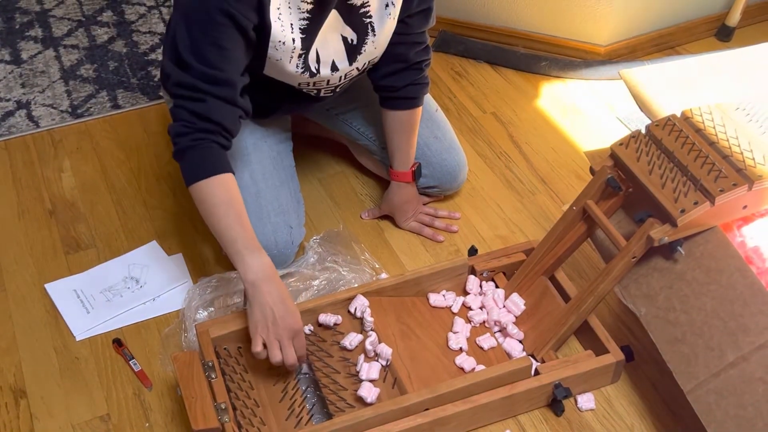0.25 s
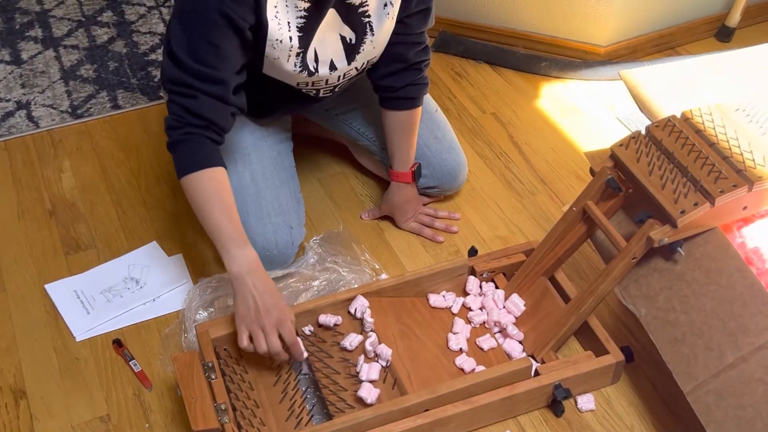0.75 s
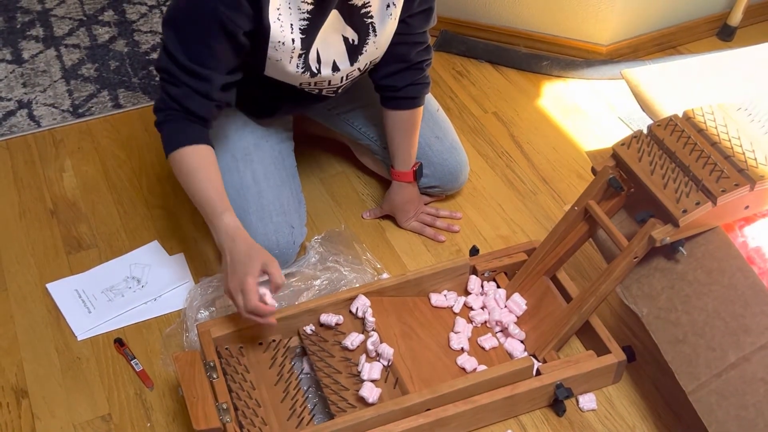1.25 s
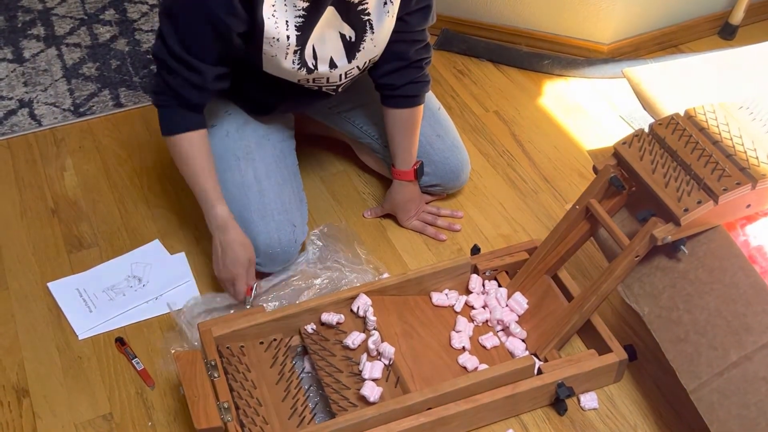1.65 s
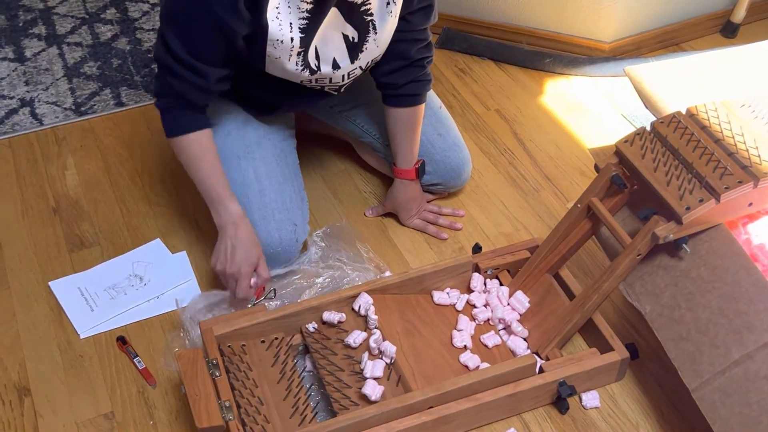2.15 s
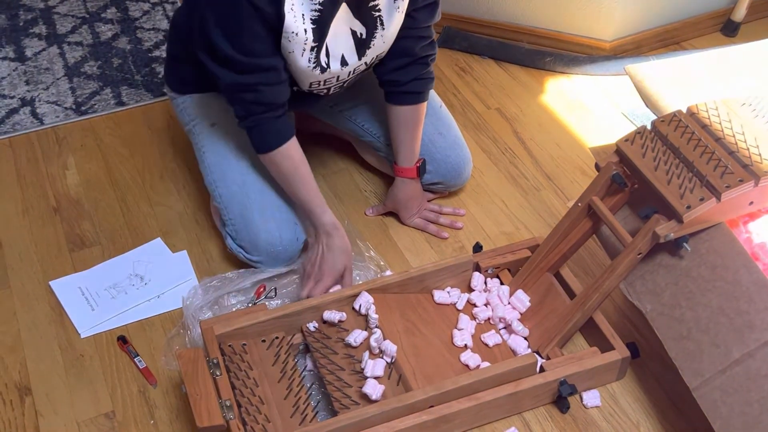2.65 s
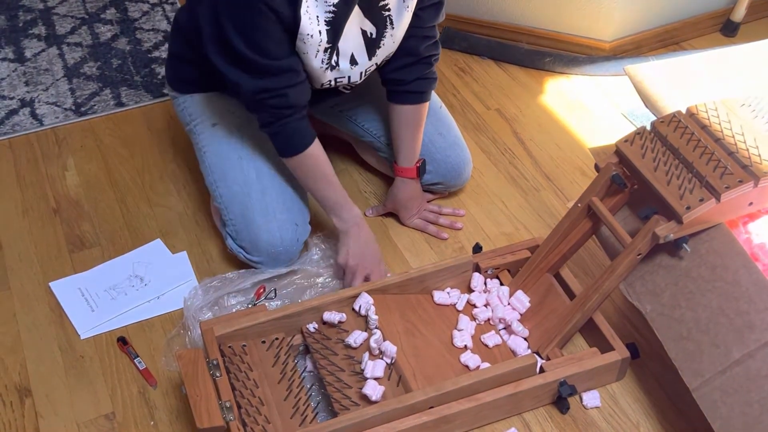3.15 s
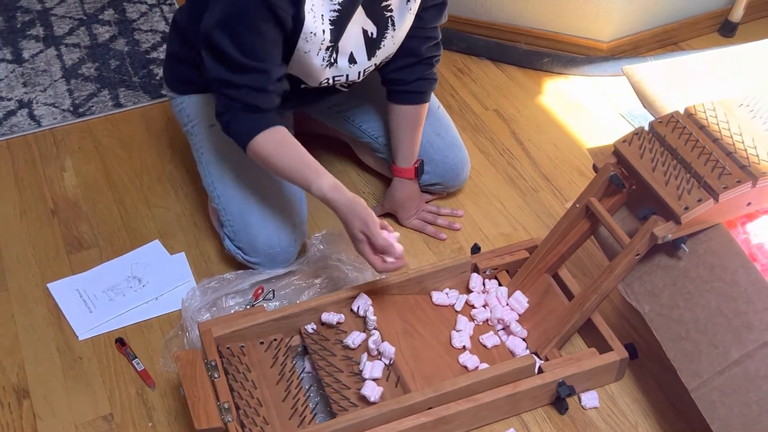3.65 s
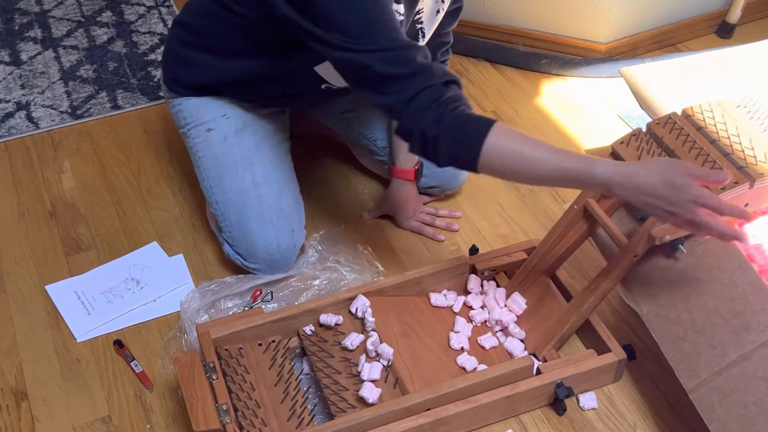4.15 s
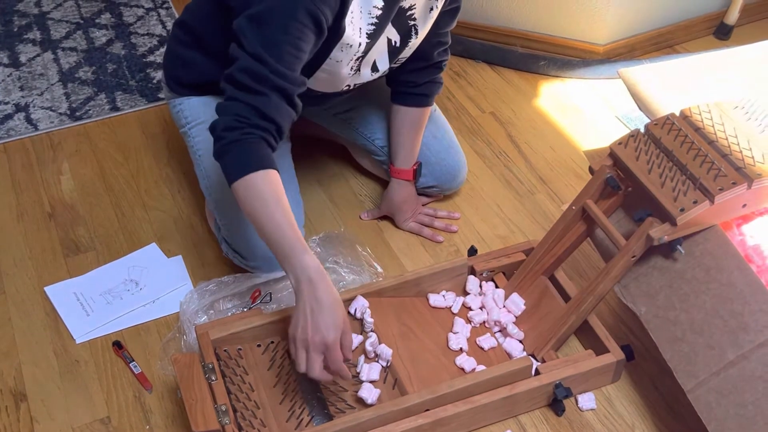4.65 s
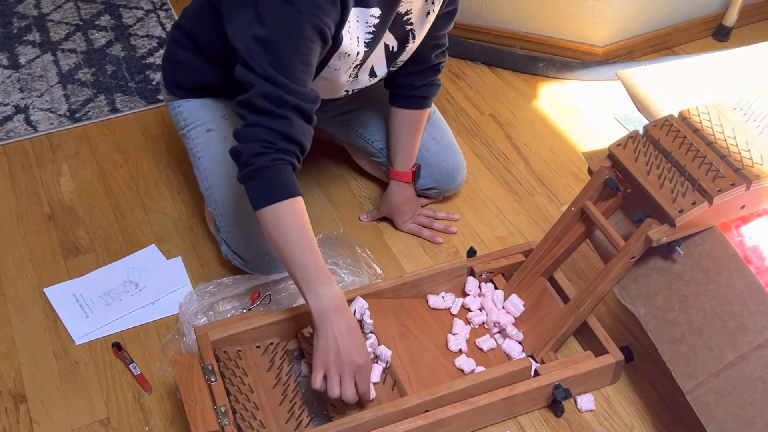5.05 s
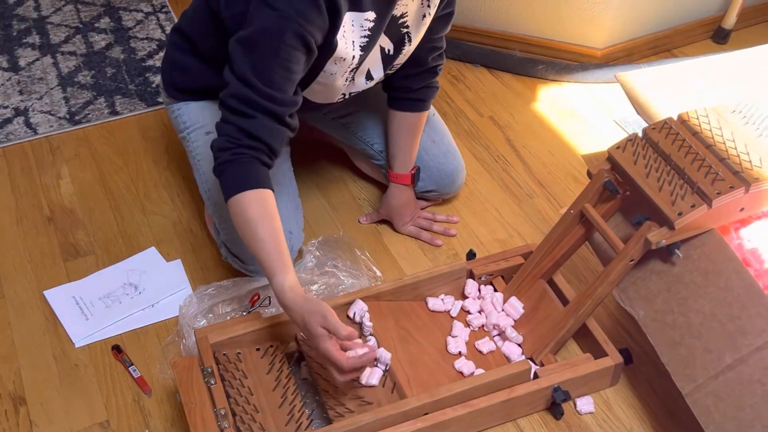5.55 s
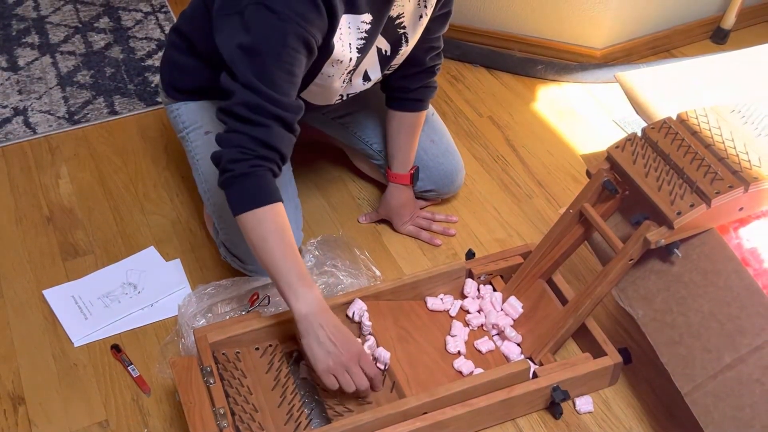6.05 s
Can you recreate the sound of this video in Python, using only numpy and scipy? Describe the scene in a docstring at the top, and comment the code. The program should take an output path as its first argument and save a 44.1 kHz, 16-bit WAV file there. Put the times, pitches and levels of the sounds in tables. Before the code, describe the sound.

Light foam pieces are handled among steel pins in a wooden tray, heard by two close microphones indoors. Short dry rustles and hollow creaks come first, then plastic film crinkling with sharp ticks and a quick rasp. A soft knock on wood precedes the busiest foam rustle and a tiny squeak. Later there are isolated scuffs, one loud crisp snap and delicate pin plucks, with short room reverberation over soft rumble and faint hiss.

```python
"""A live room with a wooden floor: someone kneeling picks foam packing peanuts out of a wooden tray set with steel pins.
The foam rustles, creaks and scuffs as crackles shaped by finger pressure, snaps as noise bursts, squeaks as rough tones.
The hand crinkles a plastic bag, drags one sharp rasp from it, rubs and bumps the wood (ringing modes), plucks the pins.
A diffuse noise tail answers as the room, over a low rumble, a drone and a hiss; two close microphones hear it."""
import sys
import numpy as np
from scipy import signal
from scipy.fft import rfft, irfft, next_fast_len
from scipy.io import wavfile
from scipy.ndimage import map_coordinates

SR = 44100
rng = np.random.default_rng(int(sys.argv[2]) if len(sys.argv) > 2 else 0)


def dump_mix(stems):
    """Bounce the given channels to the path in sys.argv[1] as a 16-bit WAV at rate SR."""
    frames = np.atleast_2d(stems).T  # one column per channel
    limited = np.clip(frames, -1, 1)  # hard clip at full scale
    pcm = np.round(limited * 32767).astype(np.int16)
    wavfile.write(sys.argv[1], SR, pcm)


N = 278271
TIME = np.arange(N) / SR


def amp(db):
    """Decibels to gain."""
    return 10 ** (np.asarray(db) / 20)


def unit(x):
    """Scale to rms 1."""
    return x / np.sqrt(np.mean(x ** 2) + 1e-20)


def along(points, hz):
    """(frequency [Hz], value) points read on a log frequency axis."""
    f, v = np.transpose(points)
    return np.interp(np.log(hz + 1), np.log(f + 1), v)


def wobble(rate):
    """A smooth random curve, rate knots a second."""
    knots = rng.standard_normal(int(N * rate / SR) + 4)
    return map_coordinates(knots, [TIME * rate])


def filtered(x, response):
    """x times a complex response of frequency."""
    size = next_fast_len(N + SR // 2)
    return irfft(rfft(x, size) * response(np.fft.rfftfreq(size, 1 / SR)), size)[..., :N]


def coloured(x, spectrum, size=4096):
    """x through a causal (minimum-phase) filter of energy 1 with this spectrum."""
    cepstrum = irfft(np.log(amp(along(spectrum, np.fft.rfftfreq(size, 1 / SR)))))
    fold = np.r_[1, np.full(size // 2 - 1, 2), 1, np.zeros(size // 2 - 1)]
    kernel = irfft(np.exp(rfft(cepstrum * fold)))
    return signal.fftconvolve(x, kernel / np.linalg.norm(kernel))[:N]


def add(track, s, sound):
    """Mix a sound into a track at time s."""
    part = track[max(round(s * SR), 0):][:len(sound)]
    part += sound[:len(part)]


def crackle(rate, spread_db):
    """Tiny slips at random moments, rate a second, of uneven size and either sign, rms 1."""
    sizes = amp(spread_db * np.clip(rng.standard_normal(N), -2, 2))
    slips = rng.random(N) < rate / SR
    return unit(slips * sizes * rng.choice([-1, 1], N))


def burst(t60):
    """Noise that starts at about 1 and dies away at once."""
    t = np.arange(SR // 5) / SR
    decay = amp(-60 * t / t60)
    noise = rng.standard_normal(len(t)) * decay
    return noise * np.linalg.norm(decay) / np.linalg.norm(noise)


def swell(s, length):
    """A quick rise and slower fall of contact pressure, starting at s, 17 dB below its peak after length."""
    u = np.clip((TIME - s) / max(length, .002) * np.pi, 0, 20)
    return (u * np.exp(1 - u)) ** 2


def press(s, rise, fall):
    """Contact pressure that sets in, levels off towards time s and eases away again, peak 1."""
    range_db, bite = 21, 1.44  # climbed in the rise time, lost in the fall time; bite over 1 = abrupt onset
    before = np.clip((s - TIME) / max(rise, .002), 0, 10)
    after = np.clip((TIME - s) / max(fall, .002), 0, 10)
    return amp(-range_db * (before ** bite + after))


def presses(rows):
    """Gain per sample of (s, rise, fall, dB) presses; where they overlap their powers add."""
    return np.sqrt(sum((amp(db) * press(s, rise, fall)) ** 2 for s, rise, fall, db in rows))


def foam():
    """Foam beads catch and slip: a thick rustle, a hollow creak under pressure, and brief bright scuffs."""
    # fingers close on foam and let go:
    # (firmest press [s], rise [s], fall [s], rustle level [dB], creak level [dB])
    grips = [(0.336, 0.046, 0.12, -45, -46.5), (0.389, 0.11, .03, -46.5, -57),
             (0.82, 0.025, 0.069, -60, -57), (0.984, .036, .06, -46, -44.5),
             (1.232, 0.021, .04, -57.5, -74), (3.055, .033, .28, -48.5, -64), (3.135, 0.16, 0.27, -45, -62),
             (3.21, 0.19, 0.32, -46.5, -61), (3.44, 0.056, 0.06, -46, -51),
             (3.477, 0.011, 0.02, -41.5, -55), (3.522, .03, 0.045, -55, -68),
             (3.642, 0.011, 0.02, -38, -57), (3.7, 0.37, .15, -56.5, -69), (3.774, 0.023, 0.065, -51, -76),
             (3.93, 0.18, 0.086, -56, -72), (4.308, .014, 0.19, -55.5, -70), (4.466, 0.029, .09, -66, -76),
             (4.995, 0.11, .13, -57, -63.5), (5.085, 0.038, .1, -48, -57), (5.35, 0.058, .24, -56.5, -65),
             (5.708, 0.14, 0.08, -61, -65.5), (5.822, 0.028, 0.071, -49, -64),
             (5.996, 0.0054, 0.039, -51, -72), (6.3, 0.23, 0.12, -70, -76)]
    # short slips under a finger: (start [s], level [dB], length [s])
    slips = [(0.375, -32, 0.049), (0.98, -44, 0.035), (1.224, -34.5, 0.02), (1.776, -25, 0.029),
             (2.58, -39, 0.021), (2.747, -27.5, 0.024), (3.187, -19, 0.031), (3.194, -20, 0.035),
             (3.64, -35, 0.023), (3.76, -34, 0.034), (4.293, -46.5, 0.017), (5.0833, -21, 0.018),
             (5.345, -27, 0.042), (5.807, -40, 0.025)]
    # colours of rustle, creak and scuff: (frequency [Hz], relative level [dB])
    rustle_colour = [(150, -31.5), (700, -12), (1800, -5.5), (2900, -10), (4500, -4.5), (6500, -5.5),
                     (8000, -1), (9800, -5.5), (12200, 3), (14800, -2.5)]
    creak_colour = [(400, -30), (1100, -19.5), (1500, 1.5), (1800, -7.5), (2300, 1), (2750, -17.5),
                    (5000, -32)]
    scuff_colour = [(150, -33.5), (700, -25.5), (1800, -9.5), (2300, -1.5), (3000, -25), (4500, -14.5),
                    (6500, -8), (8000, 3), (9300, 0.5), (12200, 0), (14800, 5.5)]

    pressure = presses((s, rise, fall, db) for s, rise, fall, db, _ in grips)
    pressure = pressure * amp(-2.5 + 2.34 * wobble(84))
    squeeze = presses((s, rise, fall, db) for s, rise, fall, _, db in grips)
    squeeze = squeeze * amp(-6.0 + 1.9 * wobble(60))
    scuffing = sum(amp(db - 12.5) * swell(s, length) for s, db, length in slips)

    beads = crackle(rate=7000, spread_db=3.0)
    beads = beads + amp(-6.0) * crackle(rate=160, spread_db=2)  # a few beads let go with a tick
    rustle = coloured(pressure * beads, rustle_colour)
    creak = coloured(squeeze * crackle(rate=1100, spread_db=3.5), creak_colour)
    scuffs = coloured(scuffing * crackle(rate=5000, spread_db=4.0), scuff_colour)
    return rustle + creak + scuffs


def snaps():
    """A peanut flicks free or lands: a bright crack and a light tap of the tray."""
    # single sharp contacts: (time [s], crack level [dB], tap level relative to the crack, before a common trim [dB])
    contacts = [(0.3326, -48, -14), (0.5921, -55.5, -11), (0.8185, -37, -17), (0.971, -41, -19),
                (0.9854, -42, -17), (1.2308, -39, -28), (1.6844, -50, -19), (1.7549, -33, -13),
                (1.7614, -35, -24), (1.7843, -27, -23), (1.9555, -25, -10.5), (1.974, -36, -22),
                (2.5865, -40, -28), (3.022, -41.5, -22), (3.1901, -30, -12.5), (3.2018, -34, -29),
                (3.311, -50, -17), (3.4178, -43.5, -15), (3.4424, -43, -15), (3.4735, -36.5, -5.5),
                (3.6381, -36, -8), (4.0397, -51.5, -26.5), (4.3011, -45.5, -8), (4.355, -51, 1),
                (4.4677, -50.5, -18), (5.087, -24, -35), (5.1034, -33, -31), (5.5548, -53, -26),
                (5.9948, -38, -32), (6.009, -43, -30), (6.125, -52.5, -12)]
    # colours of crack and tap: (frequency [Hz], relative level [dB])
    crack_colour = [(150, -45.5), (700, -6), (1900, -16), (3000, -17), (4600, -8), (6300, -6.5),
                    (8000, -7.5), (10000, -4), (12000, 5.5), (14800, 0)]
    tap_colour = [(200, -21.5), (700, -6), (1400, 1.5), (2300, 6.5), (3200, -17.5), (8000, -31.5)]

    cracks, taps = np.zeros(N), np.zeros(N)
    for s, db, tap_db in contacts:
        add(cracks, s, amp(db) * burst(t60=0.01))
        add(taps, s, amp(db + tap_db - 2) * burst(t60=0.017))
    return coloured(cracks, crack_colour) + coloured(taps, tap_colour)


def squeaks():
    """Foam sticks and slips fast enough to give a short, rough note."""
    # foam against foam: (start [s], level [dB], pitch [Hz], length [s])
    notes = [(3.184, -38, 1756, 0.02), (3.434, -53, 1650, 0.018), (5.091, -50.5, 2018, 0.042),
             (6.088, -63, 1402, 0.073)]
    track = np.zeros(N)
    for s, db, hz, length in notes:
        rough_hz = hz * (1 + 0.0412 * wobble(500))
        phase = 2 * np.pi * np.cumsum(rough_hz) / SR
        tone = np.sin(phase) + amp(-18.5) * np.sin(2 * phase)
        track += amp(db) * swell(s, length) * tone
    return track


def bag():
    """Thin film crinkles under the hand: a fine rustle with a scatter of single creases popping."""
    # the hand presses on the bag: (firmest press [s], rise [s], fall [s], crinkle level [dB])
    strokes = [(1.465, 0.071, 0.12, -61.5), (1.585, 0.13, 0.49, -48), (1.7, 0.16, 0.42, -52.5),
               (1.783, .008, 0.059, -42), (1.958, 0.018, 0.068, -38), (2.12, .12, 0.23, -52.5),
               (2.29, 0.09, 0.13, -49), (2.526, 0.048, 0.061, -52.5), (2.72, 0.13, 0.26, -52.5),
               (2.762, 0.023, 0.041, -40), (2.9, .1, 0.076, -61)]
    # colour of the film: (frequency [Hz], relative level [dB])
    film_colour = [(150, -25.5), (700, -18), (1900, -4.5), (3000, -9), (4000, -2.5), (5000, -8), (6800, -2),
                   (8200, -1.5), (10000, -6), (12600, 2.5), (14800, -4.5)]
    pressure = presses(strokes) * amp(-2.5 + 2.1 * wobble(60))
    creases = crackle(rate=3500, spread_db=1.5) + amp(-5) * crackle(rate=140, spread_db=0.5)
    return coloured(pressure * creases, film_colour)


def rasp(start=1.999, length=0.034, slip_hz=415, ring_db=-48, count=22):
    """One fast stick-slip drag on the plastic: a run of sharp ticks that swells and lets go, leaving a thin ring."""
    # colour of the ticks: (frequency [Hz], relative level [dB])
    tick_colour = [(150, -40), (600, -21), (1300, -17), (2300, -10.5), (2950, -14.5), (3400, -6.5),
                   (4900, -14.5), (6300, -4), (7500, 0.5), (8800, -10), (10300, -15.5), (12200, -1.5),
                   (14800, -9.5)]
    # ringing modes: (frequency [Hz], relative level [dB], t60 [s])
    ring_modes = [(2670, -7, .2), (3338, 2, 0.32), (4021, -3, 0.24), (6250, -0.5, .2), (6970, 1.5, .16),
                  (7200, 0.5, .16), (7655, 0, .14)]

    track, t = np.zeros(N), np.arange(SR // 3) / SR
    offsets = (np.arange(count) + rng.normal(0, .07, count)) / slip_hz
    force_db = np.interp(offsets / length, [0, .15, .6, 1, 1.5], [-6.0, -1.5, 2.3, 0.5, -19.5])
    for offset, db in zip(offsets, force_db + rng.normal(0, .8, count)):
        add(track, start + offset, amp(db - 23.5) * burst(t60=0.0099))
    sound = coloured(track, tick_colour)

    ring = np.zeros(len(t))
    for hz, db, t60 in ring_modes:
        ring += amp(db - 60 * t / t60) * np.sin(2 * np.pi * hz * t + rng.uniform(0, 2 * np.pi))
    build_up = np.minimum(t / 0.0099, 2)  # the ring grows while the ticks feed it
    add(sound, start, amp(ring_db) * ring * build_up)
    return sound


def rub():
    """Skin drags over the wood with a dull, uneven hiss."""
    # skin slides over wood: (firmest press [s], rise [s], fall [s], rub level [dB])
    slides = [(0.385, .11, 0.13, -53.5), (0.83, 0.037, 0.11, -67), (1.0, 0.11, 0.8, -67.5),
              (1.61, 0.062, .25, -58), (1.703, .025, .045, -45), (1.78, .2, 0.37, -57.5),
              (1.94, 0.12, 0.041, -50.5), (2.02, .015, 0.12, -48.5), (2.29, 0.4, 0.31, -72),
              (2.56, 0.049, .15, -67), (2.8, 0.56, 0.18, -62), (3.2, 0.35, 0.3, -59),
              (3.645, .03, 0.45, -70.5), (4.32, .05, 0.2, -60), (4.97, .12, .13, -66.5),
              (5.1, .04, 0.066, -65), (5.36, 0.13, 0.34, -69.5), (6.01, 0.025, 0.032, -59.5),
              (6.14, 0.14, 0.18, -64.5)]
    # colour of the hiss: (frequency [Hz], relative level [dB])
    rub_colour = [(200, -34.5), (500, 2), (1000, 0.5), (1600, 1), (2400, -9.5), (3500, -38.5), (8000, -44)]
    pressure = presses(slides) * amp(-4.0 + 2.3 * wobble(45))
    return coloured(pressure * crackle(rate=3000, spread_db=6), rub_colour)


def bumps():
    """The hand knocks and shoves on wood: the low modes thud under a dull scrape."""
    # soft blows on the tray and the floor: (time [s], level [dB])
    blows = [(0.391, -48.5), (1.702, -44.5), (1.784, -45), (1.904, -53), (1.923, -45), (2.792, -37),
             (2.801, -41), (2.834, -50.5), (6.012, -51), (6.185, -53)]
    # modes of the tray's side: (frequency [Hz], relative level [dB], t60 [s])
    wood_modes = [(255, -7, 0.062), (344, -1, 0.07), (425, 1.5, 0.055), (532, 0, 0.055)]
    # colour of the scrape: (frequency [Hz], relative level [dB])
    scrape_colour = [(80, -24.5), (230, -11), (400, -1), (560, -4), (740, -6.5), (1100, -9.5), (1500, -3.5),
                     (2300, -11.5), (5000, -38.5)]

    thud, scrape, t = np.zeros(N), np.zeros(N), np.arange(SR // 5) / SR
    for s, db in blows:
        ring = np.zeros(len(t))
        for hz, mode_db, t60 in wood_modes:
            decay = amp(mode_db + rng.normal(0, 0.95) - 60 * t / t60)
            ring += decay * np.sin(2 * np.pi * hz * t + rng.uniform(0, 2 * np.pi))
        soft_onset = 1 - np.exp(-t / .0015)
        add(thud, s, amp(db - 4.5) * ring * soft_onset)
        add(scrape, s, amp(db - 7) * burst(t60=0.065))
    return thud + coloured(scrape, scrape_colour)


def pluck(pitch, chance):
    """A few neighbouring pins slip off the finger in turn; each rings briefly at a slightly different pitch."""
    # modes of a pin: (multiple of the pitch [ratio], relative level [dB], t60 [s])
    pin_modes = [(1, 1, 0.064), (1.11, -13, 0.09), (1.244, -4.5, 0.045), (1.5, -13, 0.066),
                 (1.76, -6.5, .07)]
    sound, t = np.zeros(SR // 5), np.arange(SR // 8) / SR
    onset = 1 - np.exp(-t / 0.00051)
    for k, (gap, detune, strength) in enumerate(chance):
        pin_hz = pitch * (1 + .016 * detune)
        ring = sum(amp(mode_db - 60 * t / t60) * np.sin(2 * np.pi * pin_hz * ratio * t)
                   for ratio, mode_db, t60 in pin_modes)
        level_db = -6.5 - 3.3 * k + 1.1 * strength
        add(sound, k * 0.0037 * (1 + 0.38 * gap), amp(level_db) * ring * onset)
    return sound


def pins(count=14, size=4):
    """A sweeping finger plucks row after row of pins at an uneven pace, ever more lightly."""
    # sweeps along the steel pins: (start [s], length [s], level [dB], pitch [Hz])
    sweeps = [(1.221, .25, -64.5, 4380), (4.302, .01, -53.5, 5460), (4.95, .08, -56, 4710),
              (5.085, .07, -50, 4550), (5.5, .05, -64, 4450), (5.6086, .08, -60.5, 4580),
              (5.998, .3, -60, 4645), (6.123, .18, -63, 5160)]
    row_gap_s, scatter, ease_db_per_s = 0.032, .15, 14  # row to row, its unevenness, fading of the touch
    track = np.zeros(N)
    for s, length, db, pitch in sweeps:
        gaps = row_gap_s * np.exp(scatter * rng.standard_normal(count))
        delays = np.cumsum(gaps) - gaps[0]
        for delay, chance in zip(delays, rng.standard_normal((count, size, 3))):
            if delay < length:
                add(track, s + delay, amp(db - ease_db_per_s * delay) * pluck(pitch, chance))
    return track


def sheen(x, split_hz=9800):
    """The top of the spectrum is brighter in some handfuls and duller in others."""
    # gain of the band above the split: (time [s], level [dB])
    top_gain = [(0.35, 2), (0.9, -2.5), (1.25, 3.5), (1.6, -0.5), (3.2, -1.5), (4.3, -6), (5.0, 1),
                (5.8, -2.5), (6.3, 5)]
    top = filtered(x, lambda hz: 1 - 1 / (1 + (hz / split_hz) ** 10))
    return x + top * (amp(np.interp(TIME, *np.transpose(top_gain))) - 1)


def diffuse(pair):
    """Two unrelated signals become left and right of a diffuse field, alike to a degree set by frequency."""
    # likeness of left and right: (frequency [Hz], correlation [0 to 1])
    likeness = [(60, 1), (130, 0.94), (300, 0.82), (700, 0.32), (1200, 0.19), (1900, 1), (7000, 1),
                (8300, 1), (9400, 1), (11000, 0.29), (15000, 1)]

    def mid_side_gains(hz):
        turn = np.arccos(np.clip(along(likeness, hz), -1, 1)) / 2
        return np.array([np.cos(turn), np.sin(turn)])

    mid, side = filtered(pair, mid_side_gains)
    return np.array([mid + side, mid - side])


def room(x):
    """Bare floor and walls: a diffuse tail in which each frequency dies at its own speed."""
    # reverberation time: (frequency [Hz], t60 [s])
    reverb_time = [(150, .35), (500, 0.46), (1500, 0.54), (4000, 0.44), (8000, 0.42), (15000, 0.31)]
    hz, t, z = signal.stft(rng.standard_normal((2, SR * 3 // 5)), SR, nperseg=256)
    decay = amp(-60 * t / along(reverb_time, hz)[:, None])
    build_up = 1 - np.exp(-t / 0.003)
    tail = signal.istft(z * decay * build_up, SR, nperseg=256)[1]
    tail = tail / np.linalg.norm(tail[0])
    return diffuse(signal.fftconvolve(x[None], tail, axes=1)[:, :N])


def background():
    """Diffuse noise: a slightly wavering house rumble, a low drone of ventilation and a faint hiss."""
    # colours of the three layers: (frequency [Hz], relative level [dB])
    rumble_colour = [(20, -30.5), (32, -14), (40, -15.5), (50, -3), (65, -0.5), (82, -1), (100, -6),
                     (127, -2), (154, -10.5), (190, -9), (310, -17), (430, -17.5), (600, -23), (800, -44),
                     (3000, -74)]
    drone_colour = [(30, -81), (48, -26.5), (54, -7.5), (58, 6), (64, -18), (100, -66), (400, -95)]
    hiss_colour = [(300, -6.5), (700, 3.5), (1200, -5), (1800, -2.5), (2350, -6), (2900, -23),
                   (5000, -21.5), (9000, -30), (12000, -18), (15000, -32.5)]

    def noise(spectrum):
        pair = rng.standard_normal((2, N))
        return unit(diffuse(filtered(pair, lambda hz: amp(along(spectrum, hz)))))

    rumble = amp(-52 + 0.06 * wobble(6.6)) * noise(rumble_colour)
    return rumble + amp(-57.5) * noise(drone_colour) + amp(-74) * noise(hiss_colour)


def scene():
    """All handling sounds reach the two microphones with a phase gap that grows in the treble."""
    # phase gap: (frequency [Hz], lead of the left microphone [rad])
    phase_lead = [(0, 0), (750, -.3), (1100, -1.1), (1550, 0), (7400, 0), (8400, .9), (8900, 3),
                  (10000, 3.3), (11300, 6.1), (12100, 6.3), (14200, 9.3), (14800, 9.6), (15700, 11.2)]
    rustle = sheen(foam() + bag()) + rub()
    scrape = rasp()
    clicks = sheen(snaps())
    body = bumps() + squeaks() + pins()
    near = rustle + scrape + clicks + body
    far = amp(-7.5) * room(rustle) + amp(-5) * room(scrape)
    far = far + amp(-5) * room(clicks) + amp(-6.0) * room(body)

    def lead(hz):
        gap = np.interp(hz, *np.transpose(phase_lead))
        return np.exp(.5j * np.outer([1, -1], gap))  # half the gap on each side

    return filtered(near + far, lead) + background()


def record(dry):
    """A sharp band limit: nothing passes from 16 kHz upwards."""
    return filtered(dry, lambda hz: hz < 16000)


dry = scene()
out = record(dry)
dump_mix(out)
```